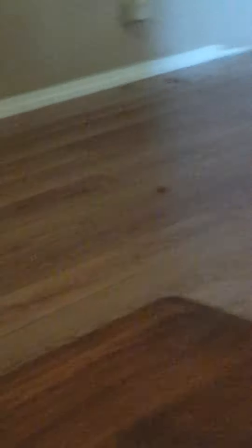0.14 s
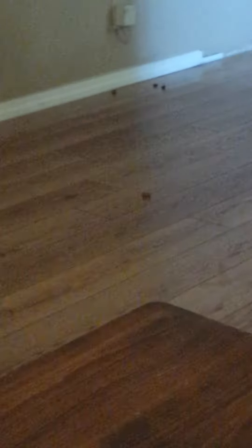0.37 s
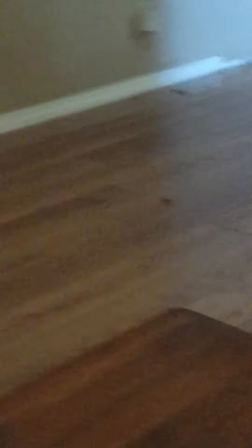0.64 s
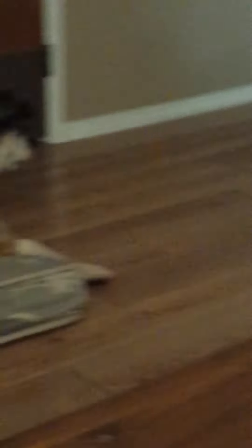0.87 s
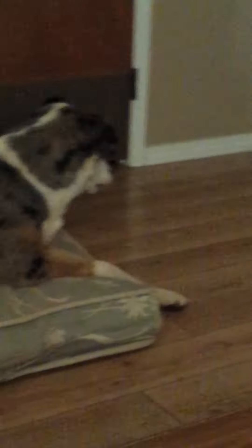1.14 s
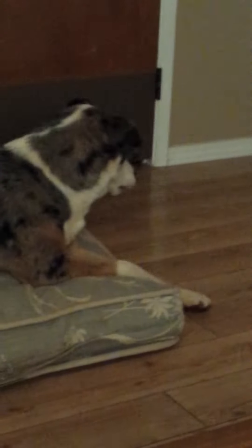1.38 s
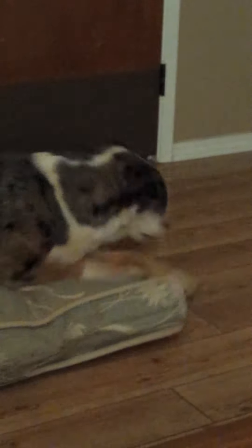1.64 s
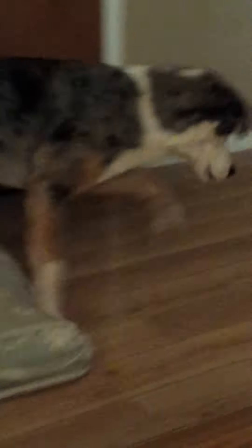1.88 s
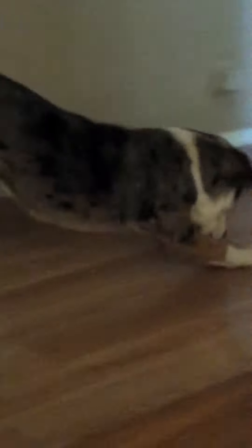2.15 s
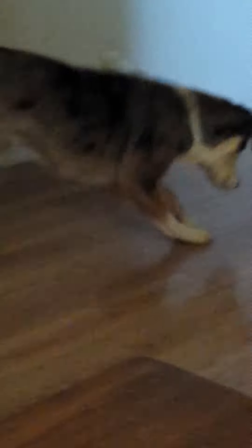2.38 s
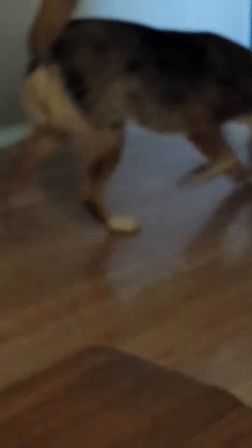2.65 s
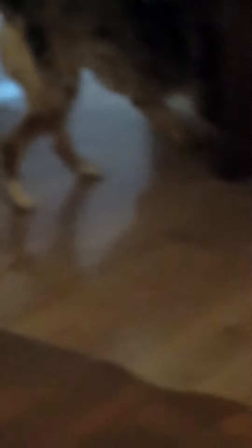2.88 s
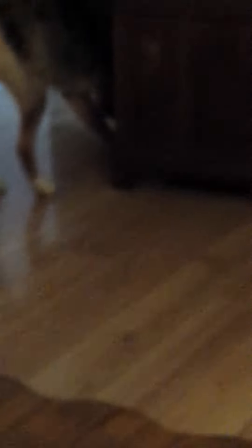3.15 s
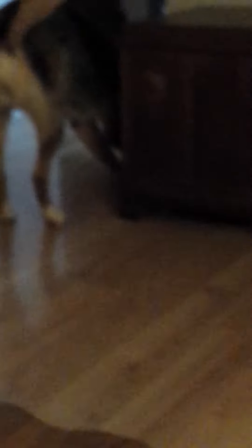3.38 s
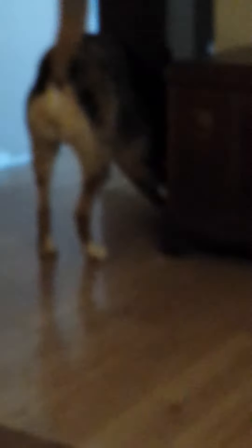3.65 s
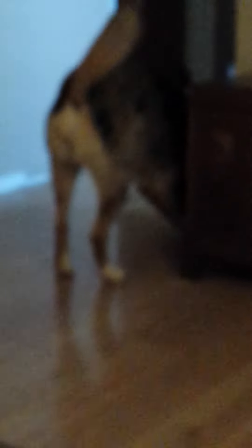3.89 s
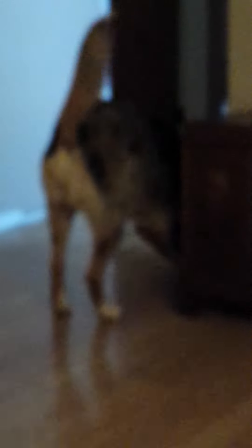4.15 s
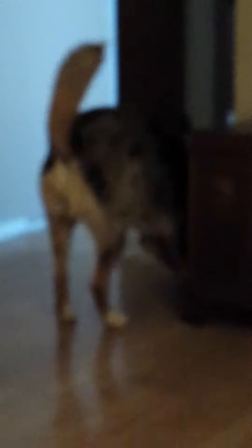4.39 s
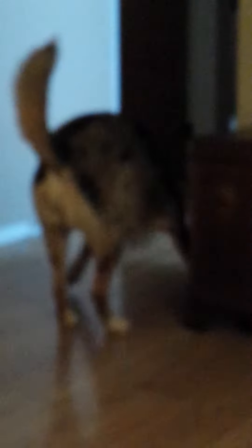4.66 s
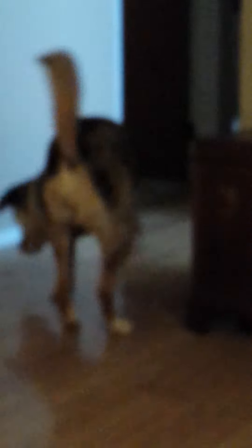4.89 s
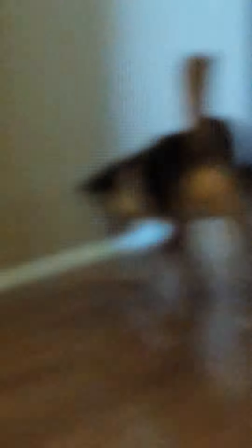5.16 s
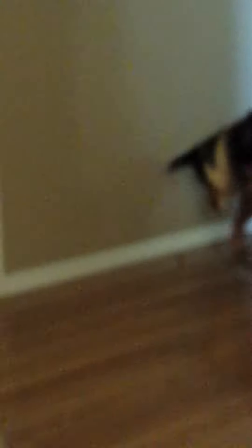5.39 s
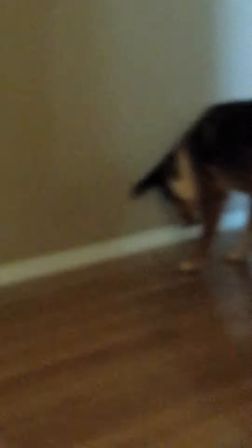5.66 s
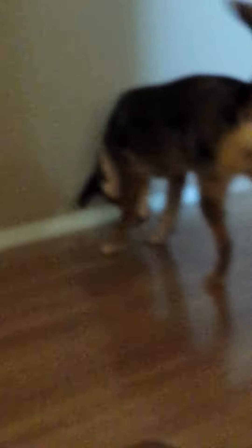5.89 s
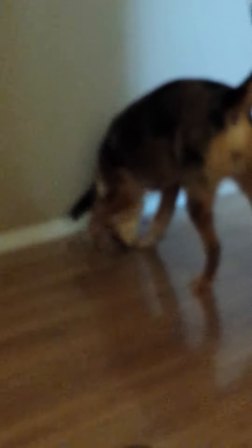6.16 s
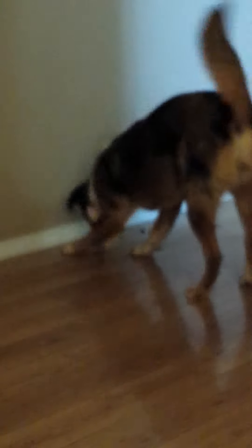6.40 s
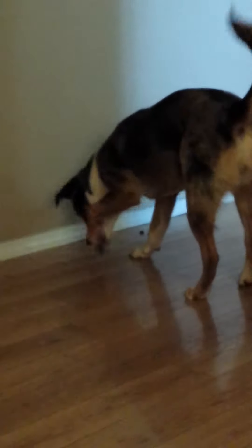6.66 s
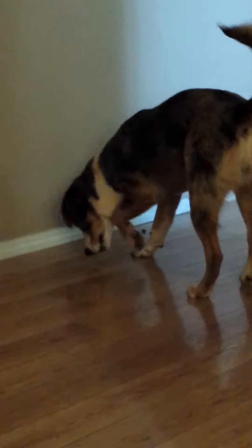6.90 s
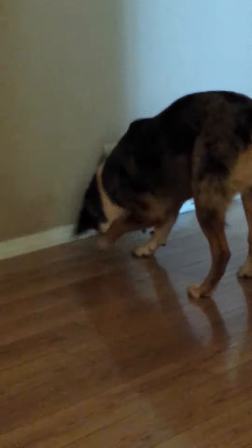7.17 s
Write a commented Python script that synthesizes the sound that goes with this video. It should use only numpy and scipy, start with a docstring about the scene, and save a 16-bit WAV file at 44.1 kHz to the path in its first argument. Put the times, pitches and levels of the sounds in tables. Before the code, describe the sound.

A bare, reflective room in a home, heard from a few steps away. A soft low hum and faint hiss run throughout, alone for the first 1.5 s. A light claw scrape begins, with a tick at 1.7 s. At 2.1-2.2 s the dog lands with several quick padded thumps, clicks and skidding; a sharp clack follows at 2.45 s, another thumping scramble at 2.7-2.8 s, and a knock at about 3.0 s with a dragging scrape. Weaker ticks come at 3.2-3.3 s and one at 3.8 s, then near quiet with a faint scrape around 4.4 s. From 4.8 to 5.6 s a dense flurry of hard claw clicks and short skids breaks out, loudest near 5.0 s. Faint scraping at 6.0-6.2 s leads to a burst at 6.3-6.4 s with a sharp click and thump. Soft dull taps at 7.1-7.3 s end it, each contact ringing briefly.

```python
"""A dog leaps off its cushion onto a hardwood floor and chases a scrap of food in a bare, echoing room.
Low room tone (shaped noise) lies under everything and is alone for 1.5 s; then claws begin to skid and tick:
grit and impulses through board resonances. From 2.1 s paws also thump, ringing decaying floor modes.
After a sparser stretch a dense flurry comes at 4.8-5.6 s, another burst near 6.3 s, last contacts at 7.1-7.3 s.
The room rings after each contact: decaying noise, with a new pattern for each spot on the floor."""
import sys
import numpy as np
from scipy import signal
from scipy.io import wavfile
from scipy.ndimage import uniform_filter1d

SR = 44100
rng = np.random.default_rng(int(sys.argv[2]) if len(sys.argv) > 2 else 0)


def undo_db(level):
    """Turn decibels back into plain size, where 20 dB means ten times bigger."""
    steps = np.asarray(level, float) / 20
    return 10 ** steps


def wav_out(sig):
    """Save sig, one row per channel (or a flat mono array), as 16-bit PCM at SR to the path in sys.argv[1]."""
    wavfile.write(sys.argv[1], SR, np.round(np.clip(np.atleast_2d(sig).T, -1, 1) * 32767).astype(np.int16))


N = 321218
LEFT_LAG_S = .00034


def rms_one(x):
    """Scale to rms 1."""
    return x / np.sqrt(np.mean(x ** 2) + 1e-20)


def at_hz(points, hz):
    """Read a table on a log-frequency axis."""
    table_hz, values = np.array(points).T
    return np.interp(np.log(hz), np.log(table_hz), values)


def drift(rate_hz):
    """Slow random wander of rms 1: two-pole low-passed noise, computed on every 40th sample."""
    r = np.exp(-80 * np.pi * rate_hz / SR)
    noise = rng.standard_normal(N // 40 + 2002)
    slow = signal.lfilter([1], [1, -2 * r, r * r], noise)[2000:]   # drop the filter's start-up
    return np.interp(np.arange(N) / 40, np.arange(len(slow)), rms_one(slow))


def resonate(x, hz, width_hz):
    """Two-pole resonance, gain 1 on top."""
    r = np.exp(-np.pi * width_hz / SR)
    zeros = np.array([1, 0, -1]) * (1 - r * r) / 2
    poles = [1, -2 * r * np.cos(2 * np.pi * hz / SR), r * r]
    return signal.lfilter(zeros, poles, x + 1e-18)


def diffuse_bands(size):
    """Yield centre Hz and a stereo noise band; mid and side are mixed for a set left-right likeness."""
    # band edges: f/Hz
    edges_hz = 25 * 2 ** np.arange(0, 9.6, .4)
    # left-right correlation: f/Hz, likeness/1
    likeness = [(60, 0.77), (240, 1), (950, 0.17), (3770, 0.02), (15000, -0.0)]
    # level of left over right: f/Hz, level/dB
    left_over_right = [(60, 4.5), (240, 2.5), (950, 4), (3770, 4.5), (15000, 1)]
    white = rng.standard_normal((2, 2, size))
    for k, (low_hz, high_hz) in enumerate(zip(edges_hz, edges_hz[1:])):
        band_pass = signal.butter(2, [low_hz, high_hz], "band", fs=SR, output="sos")
        mid, side = signal.sosfilt(band_pass, white[k % 2])   # neighbouring bands are independent
        hz = np.sqrt(low_hz * high_hz)
        alike = np.clip(at_hz(likeness, hz), 0, 1)
        lean = undo_db(np.array([[.5], [-.5]]) * at_hz(left_over_right, hz))
        yield hz, lean * (np.sqrt(1 + alike) * mid + np.sqrt(1 - alike) * side * [[1], [-1]])


def room_tone():
    """Steady rumble and hiss of the house and the microphone, wavering a little; later on the left."""
    # spectrum of the tone: f/Hz, relative level/dB
    spectrum = [(21, -48), (35, -49), (54, 1.5), (91, -13), (124, 1), (205, -12.5), (239, -9.5),
                (332, -12.5), (438, -22), (497, -10), (550, -14), (624, -20.5), (2770, -27), (5220, -36.5),
                (14700, -40.5)]
    together = drift(2.1)
    tone = np.zeros((2, N))
    for hz, band in diffuse_bands(N):
        tone += band * undo_db(at_hz(spectrum, hz) + 0.09 * together + 1.2 * drift(16))
    tone[0] = np.roll(tone[0], round(LEFT_LAG_S * SR))
    return undo_db(-47) * rms_one(tone)


def room(x, gap_s, build_s):
    """Reflections arrive after a short gap, thicken and die band by band; each spot has its own pattern."""
    # reverberation time: f/Hz, t60/s
    room_t60 = [(100, 1), (500, 1), (1400, 0.49), (3700, 0.4), (9700, 0.44)]
    # times between which the dog keeps to one spot: t/s
    moves_s = [0, 2.05, 2.38, 2.66, 2.93, 3.7, 4.7, 4.96, 5.12, 5.38, 5.9, 8]
    early_db, early_s = 3.5, 0.011   # the first echoes, from the near wall, are louder
    uneven_db, uneven_s = 8.0, 0.01   # and uneven
    t = np.arange(int(.7 * SR)) / SR
    out = np.zeros((2, N + SR))
    for start_s, end_s in zip(moves_s, moves_s[1:]):
        echo = sum(band * undo_db(-60 * t / at_hz(room_t60, hz)) for hz, band in diffuse_bands(len(t)))
        echo *= 1 - np.exp(-np.maximum(t - gap_s, 0) / build_s)
        chance = rng.standard_normal(len(t) // 16 + 1).repeat(16)[:len(t)]
        echo *= undo_db(early_db * np.exp(-t / early_s) + uneven_db * np.exp(-t / uneven_s) * chance)
        echo /= np.sqrt(np.sum(echo ** 2) / 2)
        i, j = int(start_s * SR), int(end_s * SR)
        heard = signal.fftconvolve(x[None, i:j], echo, axes=1)
        out[:, i:i + heard.shape[1]] += heard
    return out[:, :N]


def paws():
    """Slap and weight are soft pushes; each rings the floor modes near its centre until the paw damps them."""
    # paws set down: t/s, relative level of the pad's slap/dB, centre of the modes reached f/Hz,
    # free ringing/s, relative level of the weight that follows/dB
    thumps = [(2.124, -31, 545, .033, -19), (2.153, -26, 740, 0.053, -40),
              (2.164, -21.5, 360, 0.015, -12.5), (2.19, -28.5, 460, .04, -16.5),
              (2.247, -45, 200, 0.026, -53), (2.428, -38.5, 203, 0.036, -60),
              (2.728, -28.5, 260, 0.026, -13.5), (2.733, -35.5, 704, 0.088, -47),
              (2.772, -26.5, 185, .034, -23.5), (4.833, -36, 197, 0.01, -32),
              (4.985, -40.5, 454, 0.026, -47), (5.066, -35.5, 120, 0.035, -56),
              (5.189, -42.5, 434, 0.034, -29.5), (6.385, -25.5, 227, 0.12, -33.5),
              (7.238, -39.5, 145, 0.044, -43)]
    # floor as a plate on joists: f/Hz, relative level/dB, t60/s
    floor = [(60.4, -3, 0.19), (84, 5, 0.11), (123, 2, 0.19), (158, -9, 0.45), (209.6, -1, 0.22),
             (264, 5, 0.069), (314, 7, 0.055), (384, 1.5, 0.11), (491, 0.5, 0.14), (555, 1.5, 0.1),
             (680, 3, 0.087), (780, -1, 0.12), (1040, 5.5, 0.032)]
    # the weight comes later and reaches the deepest modes
    weight_lag_s, weight_hz, weight_free_s = 0.02526, 100.3, 0.019
    shortest_rise_s, damping_s = 0.0054, .008
    pushes = []
    for at_s, slap_db, slap_hz, slap_free_s, weight_db in thumps:
        pushes.append((at_s, slap_db, slap_hz, slap_free_s))
        pushes.append((at_s + weight_lag_s, weight_db, weight_hz, weight_free_s))
    uneven_db = rng.normal(0, 0.81, (len(pushes), len(floor)))
    out, t = np.zeros(N + SR), np.arange(SR // 2) / SR
    for (at_s, db, centre_hz, free_s), own_db in zip(pushes, uneven_db):
        ringing = np.zeros(len(t))
        for (hz, level_db, t60_s), own in zip(floor, own_db):
            off_centre_db = 13.5 * np.log2(hz / centre_hz) ** 2
            ringing += undo_db(level_db + own - 60 * t / t60_s - off_centre_db) * np.sin(2 * np.pi * hz * t)
        damped = np.exp(-np.maximum(t - free_s, 0) / damping_s)
        rise = np.sin(np.pi / 2 * np.minimum(t / max(1 / centre_hz, shortest_rise_s), 1))
        i = round(at_s * SR)
        out[i:i + len(t)] += undo_db(db) * ringing * damped * rise
    return out[:N]


def contact_force(k, octaves, outer):
    """Taps and knocks on board resonance k: one impulse per contact. Rows: direct, into the room."""
    # claw taps: t/s, relative level of the middle resonance/dB, tilt/(dB/octave),
    # drop of the other resonances/dB, level sent into the room over direct/dB
    taps = [(1.7045, -20.5, -3, 8.5, 6.5), (2.1238, -24, -7, 12, 4), (2.155, -18.5, 8, 19.5, 6),
            (2.4016, -26.5, -3.5, 12, 3.5), (2.4493, -6.5, 0, 13.5, 4), (2.7073, -42.5, 8, 0, 7),
            (2.7295, -30, 4, 16.5, 13), (2.74, -32, 1, 20, -8), (2.784, -34.5, 7, 5, -9),
            (2.8338, -23.5, -12.5, 7.5, 4), (2.9764, -9.5, -10, 4, -6), (3.224, -28, -9, 1.5, -2.5),
            (3.309, -29, -20.5, 12, 5), (3.7975, -15, -3, 12, 2.5), (4.2129, -59.5, -16, -8, 2.5),
            (4.2663, -62, -15, -11.5, 4), (4.2976, -40, 8.5, 12.5, -3), (4.343, -52, -17, -1, 2),
            (4.818, -19.5, 2.5, 11.5, 6), (4.914, -15, -11, 19, -6), (4.93, -22, -3, 10.5, 8.5),
            (4.9834, -2, -2.5, 13.5, 1), (5.1335, -6.5, -5, 15, -2), (5.234, -17.5, -10, 12, -4),
            (5.3981, -17.5, -1, 11, 6), (5.4648, -17, 2, 32, -16), (5.5215, -17, -10, 18, -5),
            (5.538, -30, -3, 15, -5), (5.5557, -26.5, -9.5, 10, -0.5), (6.272, -34.5, 11, 14, 6.5),
            (6.3878, -6.5, -4, 19, 1), (6.4747, -44, 9, 2, -4), (7.1215, -52, 0, -0.5, -2),
            (7.149, -56.5, -5, -5, 6)]
    # how strongly a tap drives each board resonance: level/dB
    tap_colour_db = [15.2, 29.45, 22.3, 35.03, 13.3]
    # dull knocks, lowest resonance only: t/s, relative level/dB
    knocks = [(2.126, -42), (2.1559, -19), (2.782, -27.5), (2.8338, -45), (2.9764, -39), (3.309, -37.5),
              (5.1331, -22), (5.3977, -25), (5.998, -29.5), (6.2109, -36), (7.1217, -27), (7.148, -31)]
    knock_colour_db, knock_room_db = 29, -1
    force = np.zeros((2, N))
    at_s, middle_db, tilt_db, lower_db, sent_db = np.array(taps).T
    tap_db = middle_db + tilt_db * octaves - lower_db * outer + tap_colour_db[k]
    force[:, np.round(at_s * SR).astype(int)] = undo_db([tap_db, tap_db + sent_db])
    if k == 0:
        at_s, knock_db = np.array(knocks).T
        sent = np.array([[0], [knock_room_db]])
        force[:, np.round(at_s * SR).astype(int)] += undo_db(knock_db + knock_colour_db + sent)
    return force


def drag_pressure(k, octaves, outer):
    """Skids and scrapes on board resonance k: pressure swells and fades once per stroke."""
    # claws skidding: start t/s, length/s, relative level of the middle resonance/dB,
    # tilt/(dB/octave), drop of the other resonances/dB
    skids = [(1.534, 0.64, -70, -0.5, -4), (1.703, 0.1, -36.5, -0.5, 17), (1.818, 0.19, -58, 3.5, 10),
             (2.121, 0.024, -47.5, -4, -0.5), (2.154, .1, -39, -0.5, 5.5), (2.246, 0.15, -52, -1, 10),
             (2.447, 0.0067, -58, 27.5, -6), (2.694, 0.017, -38, -7, 11), (2.718, 0.082, -45.5, -0.5, 6),
             (2.832, 0.31, -47.5, 0, 10), (3.201, 0.027, -53, -7, 8), (3.292, 0.18, -54, -9.5, 11),
             (3.428, 0.17, -71, -1.5, -2.5), (4.359, 0.03, -53, -14, 12), (4.37, 0.13, -52, -6.5, 11),
             (4.761, 0.11, -51.5, -5.5, 3.5), (5.001, 0.011, -25, 7, 24), (5.24, 0.02, -27, -9, 18),
             (5.414, 0.043, -36, -9, 17), (6.166, 0.12, -62.5, -2, 7), (6.263, 0.021, -33, -11.5, 20),
             (6.379, 0.018, -42, 1, -2.5), (6.533, 0.085, -54, -5.5, 6)]
    # how strongly a skid drives each board resonance: level/dB
    skid_colour_db = [4, 13, 5, 14.5, 0.5]
    # dull scrapes, lowest resonance only: start t/s, length/s, relative level/dB
    scrapes = [(1.858, 0.25, -53.5), (2.855, 0.28, -46), (3.293, 0.091, -47), (4.997, 0.016, -29.5),
               (6.003, .26, -53), (6.174, 0.051, -49), (6.379, .032, -38)]
    scrape_colour_db = -0.5
    strokes = []
    for start_s, length_s, db, tilt_db, lower_db in skids:
        strokes.append((start_s, length_s, db + tilt_db * octaves - lower_db * outer + skid_colour_db[k]))
    if k == 0:
        strokes += [(start_s, length_s, db + scrape_colour_db) for start_s, length_s, db in scrapes]
    pressure, t = np.zeros(N), np.arange(N) / SR
    for start_s, length_s, db in strokes:
        length_s = max(length_s, .005)
        i, j = int(start_s * SR), int((start_s + length_s) * SR)
        share = np.clip((t[i:j] - start_s) / length_s, 0, 1) ** .75   # peaks before mid-stroke
        pressure[i:j] += undo_db(db) * np.sin(np.pi * share)
    return pressure


def claws():
    """Single contacts and dense uneven drags excite the board resonances. Rows: direct, into the room."""
    # board surface under a claw (knock, low, middle, high, edge): f/Hz, width of one filter pass/Hz
    board = [(1020, 640), (2450, 980), (3750, 1050), (6150, 1700), (8800, 2400)]
    grains_per_s, skid_room_db, drag_db = 9000, 4, 3.5
    drag_damping = 2.2   # widening of the resonances under a dragging claw
    grit = undo_db(2.5 * np.minimum(rng.exponential(1, N), 5)) * rng.choice([-1, 1], N)
    grit *= rng.random(N) < grains_per_s / SR
    grit = rms_one(grit) * undo_db(2 * drift(60))
    out = np.zeros((2, N))
    middle_hz = board[2][0]
    for k, (hz, width_hz) in enumerate(board):
        octaves = np.log2(np.clip(hz, board[1][0], board[3][0]) / middle_hz)
        outer = hz != middle_hz
        force = contact_force(k, octaves, outer)
        scraped = drag_pressure(k, octaves, outer) * grit * undo_db(np.array([[0], [skid_room_db]]))
        # two passes: steep flanks keep the valleys dark
        tapped = resonate(resonate(force, hz, width_hz), hz, width_hz)
        drag_width_hz = drag_damping * width_hz
        dragged = resonate(resonate(scraped, hz, drag_width_hz), hz, drag_width_hz)
        out += (-1) ** k * (tapped + dragged * undo_db(drag_db))
    # claw sounds are softened above about 11.5 kHz
    return signal.sosfilt(signal.butter(2, 11500, fs=SR, output="sos"), out)


def scene():
    """Direct sound plus room, over the room tone; direct sound is louder and a little later on the left."""
    (ticks, ticks_sent), thumps = claws(), paws()
    direct = (ticks * undo_db(-4) + thumps) * undo_db([[1.8], [-1.8]])
    direct[0] = np.roll(direct[0], round(LEFT_LAG_S / 2 * SR))
    wet = room(ticks_sent + thumps * undo_db(-14), gap_s=.001, build_s=.002)
    return direct + wet + room_tone()


def band_limit(x):
    """A steep low-pass at the top of the band."""
    return signal.sosfilt(signal.butter(12, 15630, fs=SR, output="sos"), x)


def record(dry):
    """Peaks are rounded, the microphone rolls off deep bass, faint top treble sinks when loud, top is cut."""
    rounded = .85 * np.tanh(dry / .85)
    thinned = signal.sosfilt(signal.butter(4, 55, "high", fs=SR, output="sos"), rounded)
    body = signal.sosfiltfilt(signal.butter(8, 11700, fs=SR, output="sos"), thinned)
    bright = signal.sosfilt(signal.butter(2, 1500, "high", fs=SR, output="sos"), body.mean(axis=0))
    level_db = 10 * np.log10(uniform_filter1d(bright ** 2, size=1400) + 1e-12)
    kept = undo_db(-np.clip(1.4 * (level_db + 46.5), 0, 30))
    top_cut = signal.cheby2(8, 50, 15700, fs=SR, output="sos")
    mix = signal.sosfilt(top_cut, body + kept * (thinned - body))
    return band_limit(mix)


dry = scene()
out = record(dry)
wav_out(out)
```